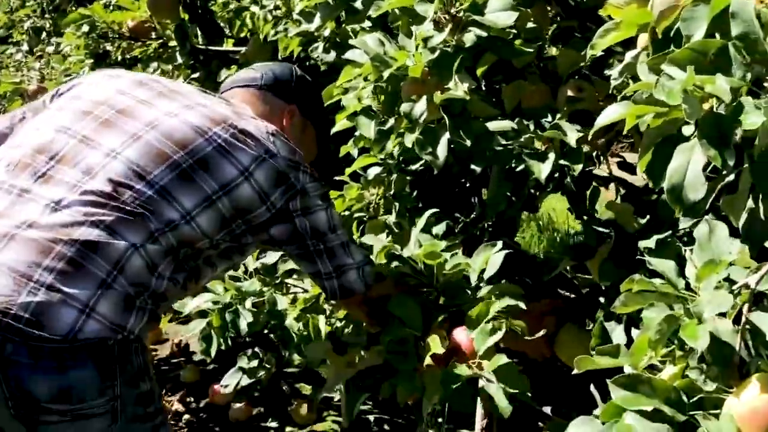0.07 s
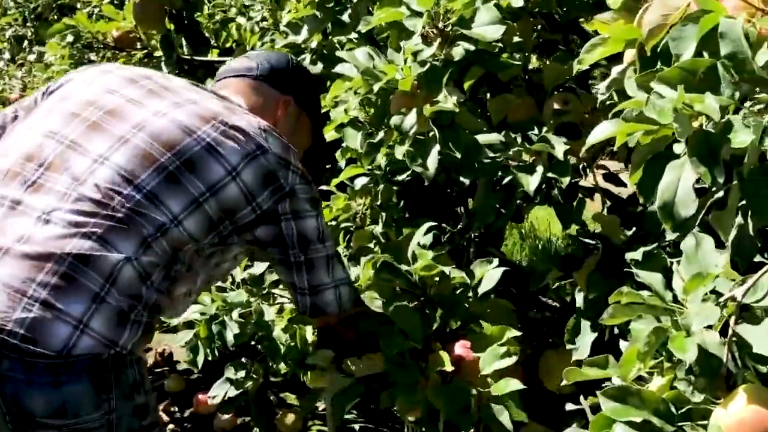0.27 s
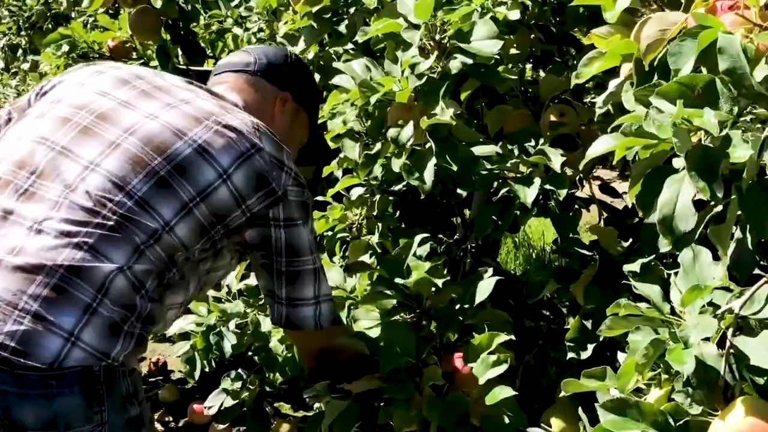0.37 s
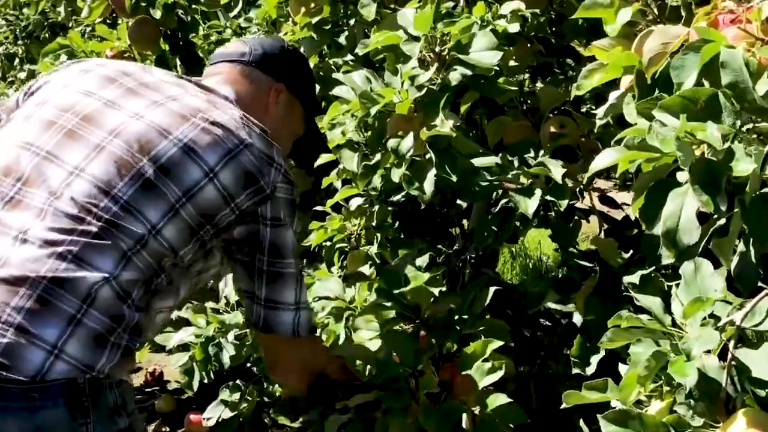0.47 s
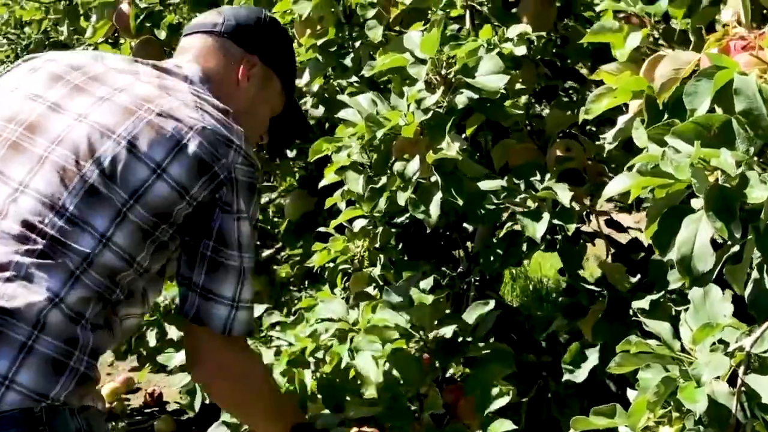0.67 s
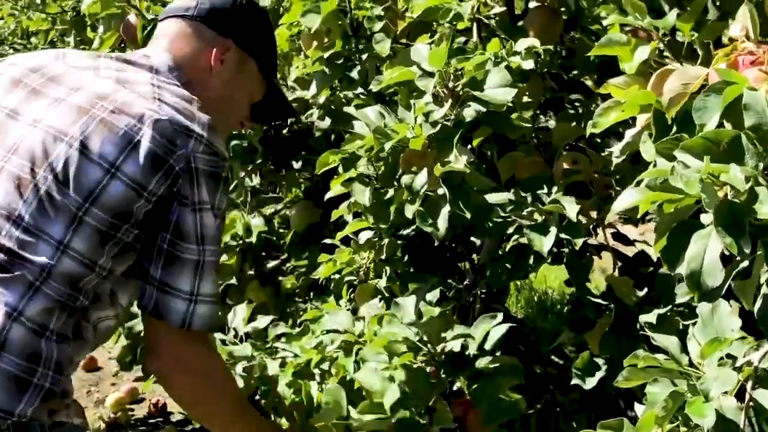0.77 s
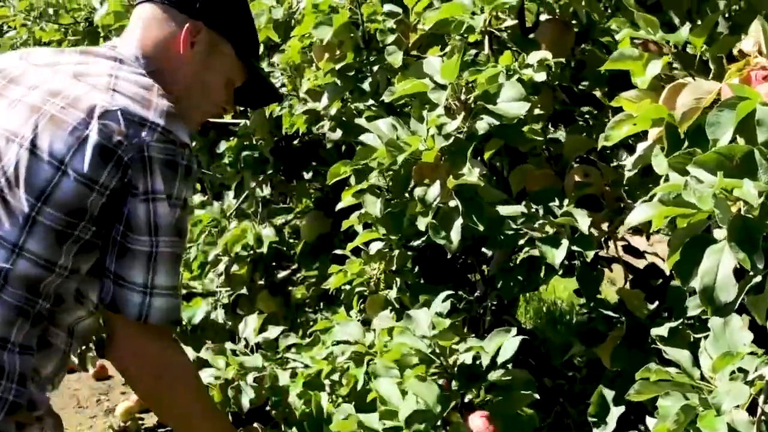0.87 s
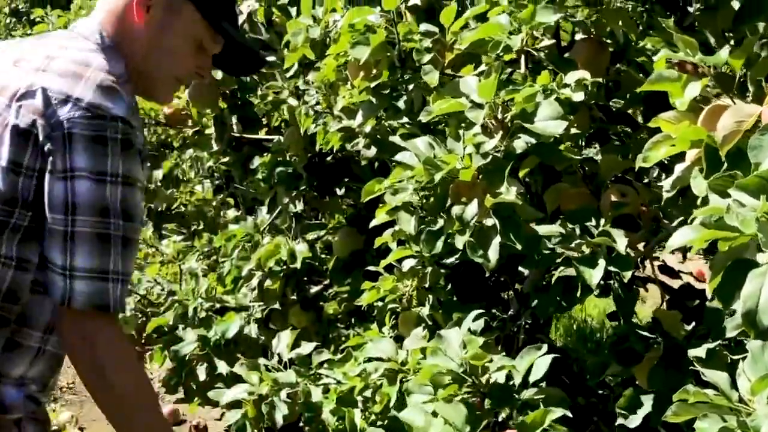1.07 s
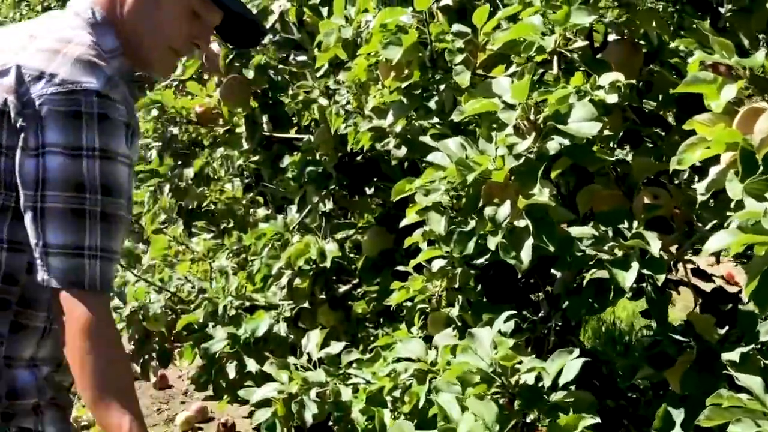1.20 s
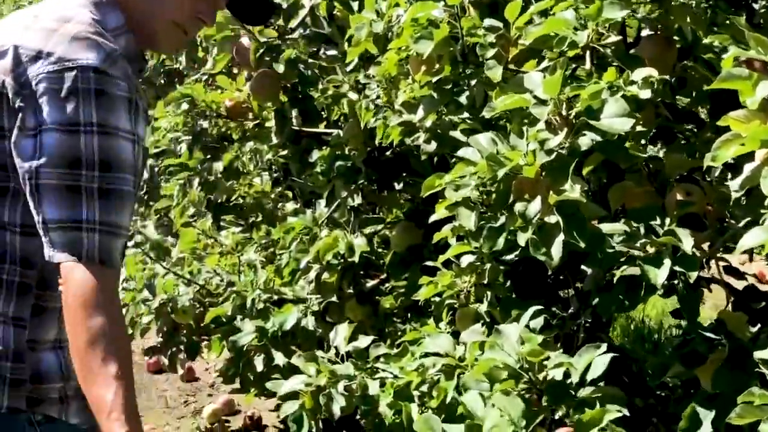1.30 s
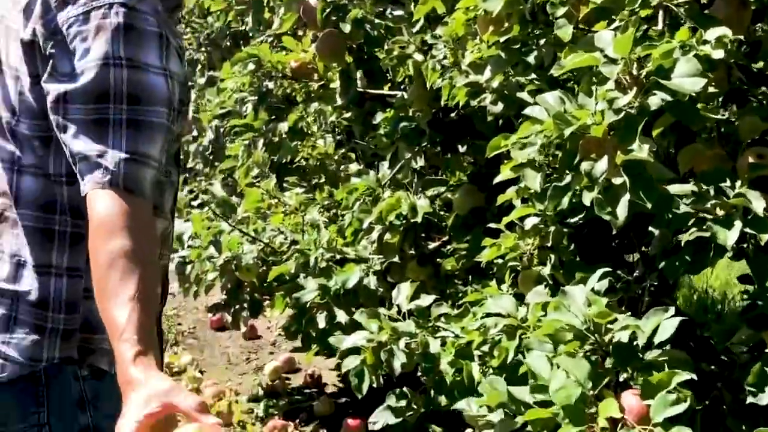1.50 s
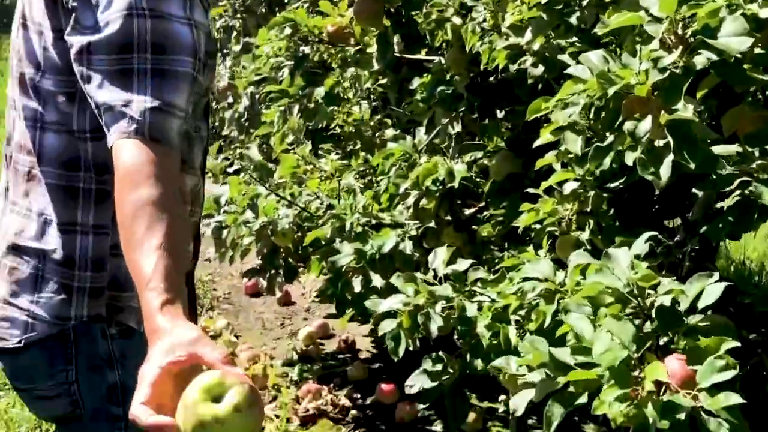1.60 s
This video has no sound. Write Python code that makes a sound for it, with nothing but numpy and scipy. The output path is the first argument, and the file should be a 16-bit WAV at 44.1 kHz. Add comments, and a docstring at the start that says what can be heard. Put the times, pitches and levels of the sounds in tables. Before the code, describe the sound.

An apple stalk snaps sharply off its branch, leaves rustling, then an apple thuds on soil

```python
"""In an orchard, an apple is pulled from a low branch. The stalk snaps and the branch springs back: damped tones and
short noise bursts. Its leaves rustle and settle: thousands of tiny contacts, with a squeak.
Single sharp ticks of leaves, twigs, cloth and litter are fading noise around one pitch each.
A loosened apple thuds on the soil: low tones with crunching noise. The picker straightens up with a brush of
clothing and a short step in dry litter: swelling crackle. A faint distant rumble of filtered noise lies under it all.
"""
import sys
import numpy as np
from scipy import signal
from scipy.fft import rfft, irfft, next_fast_len
from scipy.io import wavfile
from scipy.ndimage import uniform_filter1d

SR = 44100
rng = np.random.default_rng(int(sys.argv[2]) if len(sys.argv) > 2 else 0)


def pcm_store(signal):
    """Save signal as 16-bit PCM."""
    levels = np.round(np.clip(np.atleast_2d(signal), -1, 1) * 32767)
    wavfile.write(sys.argv[1], SR, levels.astype(np.int16).T)


N = 72765  # length in samples, 1.65 s

# A t60 is the time a sound takes to fall by 60 dB. Rise and fall times are per 20 dB.
# Every spectrum lists relative levels: (frequency [Hz], level per Hz [dB]).

# Fibres of the stalk giving way; the second is the main break: (time [s], relative strength [dB])
FIBRE_BREAKS = [(0.2211, -9), (0.2214, 0), (0.2234, -5), (0.2247, -9)]
# Ringing of stalk, fruit and twig: (frequency [Hz], relative level [dB], t60 [s])
STALK_TONES = [(950, -8, .07), (1328, 2, .052), (1485, -1, .04), (1645, -4, .035), (1832, -3, .042),
               (2296, -5, .05), (2620, -7, .045), (3312, -7, .04), (4035, -4, .04), (4425, -4, .047),
               (4995, -7, .04), (5397, -7, .04), (6580, -6, .035)]
STALK_DB, CRACK_DB, CRACK_T60_S = -20.5, -20.5, 0.025
# Spectrum of the cracking fibres: (frequency [Hz], level per Hz [dB])
CRACK_SPECTRUM = [(100, -28.5), (700, -27), (1050, -8), (1600, 1), (3000, -6), (6500, -7.5), (9500, -17),
                  (11500, -40.5), (14500, -24), (16000, -23.5)]
STALK_LOW_HZ = 884  # a thin twig radiates little bass
TONE_LAG_S = .0004  # longest time for the break to reach a tone
TEAR_DB, TEAR_T60_S = -25, 0.0019  # the first fibre parts with a bright tick
# Spectrum of that tick: (frequency [Hz], level per Hz [dB])
TEAR_SPECTRUM = [(1000, -25), (4000, 4), (9500, 0.5), (11500, -12), (14500, 0.5), (16000, -1.5)]
# The bough's knock at release: (frequency [Hz], level [dB], t60 [s])
BOUGH_KNOCK = [(66, -45, 0.068), (119, -52.5, .04)]
# The branch bends under the pull and kicks back: (peak [s], rise [s], fall [s], level [dB])
BRANCH_RECOIL = [(.218, .035, 0.077, -45)]
# Spectrum of the moving branch: (frequency [Hz], level per Hz [dB])
BRANCH_SPECTRUM = [(25, -6), (70, 7), (130, -0.5), (190, -15.5), (290, -3), (450, -16.5), (900, -21),
                   (3000, -49)]

# Leaf rustle before flutter: (time [s], level of the body [dB], level of the treble [dB])
LEAF_SHAKE = [(0, -59, -66), (0.018, -55.5, -62), (0.072, -78.5, -84.5), (.13, -77.5, -86),
              (0.186, -67.5, -60), (0.217, -44, -46.5), (0.238, -36, -37), (0.274, -37.5, -38),
              (0.309, -47, -42), (.37, -52.5, -48), (0.419, -41, -41), (.47, -47.5, -43.5),
              (0.557, -49.5, -39), (.60, -57.5, -45.5), (.70, -61.5, -46), (.81, -71, -54.5),
              (0.964, -69.5, -55.5), (.99, -72.5, -67), (1.27, -75.5, -89), (1.65, -86.5, -91.5)]
# Spectrum of the rustle's body: (frequency [Hz], level per Hz [dB])
LEAF_BODY_SPECTRUM = [(200, -23.5), (750, -21.5), (1000, -9.5), (1400, -0.5), (2300, 1.5), (3300, -6.5),
                      (5000, -30), (16000, -35.5)]
# Spectrum of the rustle's treble: (frequency [Hz], level per Hz [dB])
LEAF_TREBLE_SPECTRUM = [(500, -32.5), (2000, -13.5), (3300, -2.5), (4800, -2), (7000, -7), (9300, -13.5),
                        (11500, -31.5), (14500, -23), (16000, -22)]
LEAF_RATE_PER_S, LEAF_SPREAD_DB, LEAF_T60_S = 28000, 1, .006
FLUTTER_DB, FLUTTER_PER_S = 0.55, 52
# Waxy leaves squeaking across each other: (peak [s], rise [s], fall [s], level [dB])
LEAF_SQUEAKS = [(.902, .008, .03, -53)]
# Spectrum of a squeak: (frequency [Hz], level per Hz [dB])
SQUEAK_SPECTRUM = [(1200, -40), (2050, -16), (2260, 0), (2500, -16), (5000, -40)]

# Single sharp ticks of leaves, twigs, cloth and litter: (time [s], level [dB], centre [Hz], t60 [s])
TICKS = [(0.3255, -36, 2270, 0.022), (0.384, -33, 3520, 0.023), (0.405, -32, 3000, 0.018),
         (.4165, -34, 2420, 0.088), (0.4491, -36, 4630, 0.026), (0.4848, -36.5, 3160, 0.073),
         (0.789, -49.5, 7000, 0.085), (0.925, -47.5, 3760, 0.032), (0.9452, -39.5, 5050, 0.026),
         (1.0675, -57.5, 5000, 0.02), (1.3, -57, 6200, 0.011), (1.4140, -48, 3500, .02),
         (1.4278, -40, 4500, 0.034), (1.4281, -41, 3120, 0.013)]
TICK_WIDTH_OCT = 0.25  # distance from the centre to the -8 dB points, in octaves

# An apple lands and rebounds: (time [s], relative strength [dB])
APPLE_LANDINGS = [(.7220, 2), (0.7399, -4.5), (0.7609, -7)]
# Hollow tones of the thud: (frequency [Hz], relative level [dB], t60 [s])
THUD_TONES = [(220.5, 0.5, 0.093), (255.5, -7, 0.19), (350, -7.5, 0.086), (542, -15, .07),
              (870, -15.5, 0.029), (1130, -33, 0.079), (1350, -26, 0.11)]
# Spectrum of crunching soil: (frequency [Hz], level per Hz [dB])
SOIL_SPECTRUM = [(40, -28), (130, -18), (300, 2), (700, -5), (980, 1.5), (1350, -2.5), (1750, -9.5),
                 (2600, -2.5), (6000, -39), (16000, -26)]
THUD_DB, THUD_LOW_HZ = -32, 160
SOIL_DB, SOIL_T60_S = -35.5, 0.016
SOIL_POWER = 1.8  # gentle rebounds crunch far less than the first contact
SCATTER_DB, SCATTER_T60_S = -45, 0.22  # crumbs and litter after the first contact

# Shoes scuffing on dry litter: (peak [s], rise [s], fall [s], level [dB])
SHOE_SCUFFS = [(.415, .04, 0.13, -45.5), (1.428, 0.059, 0.047, -46)]
# Spectrum of the litter: (frequency [Hz], level per Hz [dB])
LITTER_SPECTRUM = [(100, -12), (220, -13.5), (350, 1), (700, -3), (1800, -5.5), (2400, -7), (4400, -2),
                   (6500, -8), (9300, -4), (11500, -27), (14500, -15.5), (16000, -20)]
# A heel sets down: (time [s], level [dB])
HEEL_STEPS = [(1.4331, -51)]
# Tones of the heel: (frequency [Hz], relative level [dB], t60 [s])
HEEL_TONES = [(322, -3.5, 0.12), (520, 10.5, 0.013)]
# Clothing brushing: (peak [s], rise [s], fall [s], level [dB])
CLOTH_BRUSHES = [(1.085, 0.04, 0.15, -54.5), (1.18, 0.012, 0.1, -67), (1.535, .04, .1, -75)]
# Spectrum of the clothing: (frequency [Hz], level per Hz [dB])
CLOTH_SPECTRUM = [(200, -5), (700, -12.5), (1050, 2), (1200, 3), (1340, 2), (1800, -10), (3800, -12.5),
                  (6000, -11), (9300, -22), (11500, -31), (14500, -28), (16000, -10)]
# Cloth sliding as the body unbends: (peak [s], rise [s], fall [s], level [dB])
SLEEVE_SLIDES = [(1.19, .3, 0.37, -62.5)]
# Spectrum of the sliding cloth: (frequency [Hz], level per Hz [dB])
SLEEVE_SPECTRUM = [(1000, -28.5), (4000, -16.5), (6500, -2.5), (9300, 1), (11500, -12.5), (14500, 2),
                   (16000, -4)]

# Spectrum of distant rumble and still air: (frequency [Hz], level per Hz [dB])
AIR_SPECTRUM = [(20, 5), (50, -10.5), (95, -10), (130, 2), (180, 3.5), (250, -2.5), (350, -4.5),
                (550, -14.5), (900, -19.5), (2000, -22), (3700, -59.5), (6500, -29), (9300, -23.5),
                (11500, -38.5), (15000, -28)]
AIR_DB = -63

TOP_HZ = 15900  # upper limit of the sound
CRACKLE_PITCHES = 48


def stalk():
    """Fibres crack within milliseconds; the main break rings the twig and the branch recoils."""
    first, main = FIBRE_BREAKS[0][0], FIBRE_BREAKS[1][0]
    wood = np.zeros(N)
    for tone in STALK_TONES:
        start = main + rng.uniform(0, TONE_LAG_S)
        wood += ring(start, [tone]) * rng.choice([-1, 1])
    # separate cracks add up by power
    burst = np.sqrt(sum((undb(db) * fade(at, CRACK_T60_S)) ** 2 for at, db in FIBRE_BREAKS))
    snap = undb(STALK_DB) * wood + undb(CRACK_DB) * burst * noise(CRACK_SPECTRUM)
    tear = undb(TEAR_DB) * fade(first, TEAR_T60_S) * noise(TEAR_SPECTRUM)
    knock = ring(first, BOUGH_KNOCK)
    recoil = swells(BRANCH_RECOIL) * noise(BRANCH_SPECTRUM)
    return highpass(snap, STALK_LOW_HZ, order=4) + tear + knock + recoil


def leaves():
    """Leaves collide on the shaken branch; the rustle's body dies sooner than its treble; one pair squeaks."""
    times, body_db, treble_db = np.array(LEAF_SHAKE).T
    t = np.arange(N) / SR
    flutter = FLUTTER_DB * walk(FLUTTER_PER_S)
    rustle = np.zeros(N)
    for db, spectrum in [(body_db, LEAF_BODY_SPECTRUM), (treble_db, LEAF_TREBLE_SPECTRUM)]:
        level = undb(np.interp(t, times, db) + flutter)
        contacts = crackle(LEAF_RATE_PER_S, LEAF_SPREAD_DB, LEAF_T60_S)
        rustle += level * colour(contacts, spectrum)
    return rustle + swells(LEAF_SQUEAKS) * noise(SQUEAK_SPECTRUM)


def ticks():
    """Single sharp ticks of leaves, twigs, cloth and litter: fading noise, each around its own resonance."""
    out = np.zeros(N)
    skirt = 2 ** TICK_WIDTH_OCT
    for at, db, hz, t60 in TICKS:
        shape = [(700, -30), (hz / skirt, -8), (hz, 0), (hz * skirt, -8), (11500, -32)]
        out += undb(db) * fade(at, t60) * noise(shape)
    return out


def fallen_apple():
    """A hollow thud with a short crunch of soil at each contact, then scattering crumbs."""
    thuds = sum(undb(THUD_DB + db) * ring(at, THUD_TONES) for at, db in APPLE_LANDINGS)
    crunch = sum(undb(SOIL_DB + SOIL_POWER * db) * fade(at, SOIL_T60_S) for at, db in APPLE_LANDINGS)
    scatter = undb(SCATTER_DB) * fade(APPLE_LANDINGS[0][0], SCATTER_T60_S)
    soil = (crunch + scatter) * noise(SOIL_SPECTRUM)
    return highpass(thuds + soil, THUD_LOW_HZ, order=2)


def picker():
    """Shoes grind dry litter, a heel knocks, and clothing rubs as the picker straightens."""
    litter = crackle(rate=20000, spread_db=0.5, t60=0.004)
    shoes = swells(SHOE_SCUFFS) * colour(litter, LITTER_SPECTRUM)
    heel = sum(undb(db) * ring(at, HEEL_TONES) for at, db in HEEL_STEPS)
    brushing = crackle(rate=40000, spread_db=3.5, t60=0.0097)
    cloth = swells(CLOTH_BRUSHES) * colour(brushing, CLOTH_SPECTRUM)
    sliding = crackle(rate=15000, spread_db=3.0, t60=.002)
    sleeve = swells(SLEEVE_SLIDES) * colour(sliding, SLEEVE_SPECTRUM)
    return shoes + heel + cloth + sleeve


def air():
    """Distant rumble and still air: steady, faint filtered noise."""
    return undb(AIR_DB) * noise(AIR_SPECTRUM)


def crackle(rate, spread_db, t60):
    """Dense tiny contacts (rate per second) of uneven size; each rings briefly at one of many pitches."""
    out = np.zeros(N)
    for k in range(CRACKLE_PITCHES):
        hz = TOP_HZ * (k + rng.random()) / CRACKLE_PITCHES
        hits = np.flatnonzero(rng.random(N) < rate / CRACKLE_PITCHES / SR)
        chance, turn = rng.random((2, N))[:, hits]
        size_db = -spread_db * np.log(np.maximum(chance, .002))  # the limit stops giant hits
        push = np.zeros(N, complex)
        push[hits] = undb(size_db) * np.exp(2j * np.pi * turn)  # random phase
        # a resonator turns each push into a fading tone
        pole = np.exp((2j * np.pi * hz - np.log(1000) / t60) / SR)
        out += signal.lfilter([1], [1, -pole], push + 1e-18).real
    return unit(out)


def ring(start, modes):
    """Damped tones struck at one moment."""
    age = np.arange(N) / SR - start
    return sum(undb(db) * fade(start, t60) * np.sin(2 * np.pi * hz * age) for hz, db, t60 in modes)


def fade(start, t60):
    """Sudden start and exponential decay."""
    age = np.arange(N) / SR - start
    return (age >= 0) * np.exp(-np.log(1000) * np.maximum(age, 0) / t60)


def swells(rows):
    """Loudness curve of rubs that rise to a peak and fall away."""
    t = np.arange(N) / SR
    out = np.zeros(N)
    for at, rise, fall, db in rows:
        drop_db = 20 * np.maximum((at - t) / rise, (t - at) / fall)
        out += undb(db - drop_db)
    return out


def walk(rate):
    """Smooth random wander with an rms of 1: random steps, rate per second, then averaged."""
    k = max(int(SR / rate), 1)
    steps = rng.standard_normal(N)[np.arange(N) // k]
    return unit(uniform_filter1d(steps, k))


def noise(points):
    """Random hiss with the given spectrum and an rms of 1."""
    return colour(rng.standard_normal(N), points)


def colour(x, points):
    """Filter through (frequency [Hz], level [dB]) points without sound ahead of time; output rms is 1."""
    hz, db = np.array(points, float).T
    size = 2 * next_fast_len(N)
    f = np.maximum(np.arange(size // 2 + 1) * SR / size, 1)
    gain = undb(np.interp(np.log(f), np.log(hz), db))
    # folding the cepstrum (transform of the log gain) makes the filter minimum-phase
    cepstrum = irfft(np.log(gain))
    cepstrum[1:size // 2] *= 2
    cepstrum[size // 2 + 1:] = 0
    response = np.exp(rfft(cepstrum))
    return unit(irfft(rfft(x, size) * response)[:N])


def highpass(x, hz, order):
    """Take out the bass."""
    return signal.sosfilt(signal.butter(order, hz, "high", fs=SR, output="sos"), x)


def unit(x):
    """Scale to an rms (average strength) of 1."""
    return x / np.sqrt(np.mean(x ** 2) + 1e-24)


def undb(db):
    """Decibels to gain."""
    return 10 ** (np.asarray(db) / 20)


def scene():
    """Add all sources into one channel."""
    mix = stalk() + leaves() + ticks() + fallen_apple() + picker() + air()
    return mix[None]


def record(dry):
    """Cut the top of the sound with a steep low-pass filter."""
    lowpass = signal.ellip(10, .2, 70, TOP_HZ, fs=SR, output="sos")
    return signal.sosfilt(lowpass, dry)


dry = scene()
out = record(dry)
pcm_store(out)
```